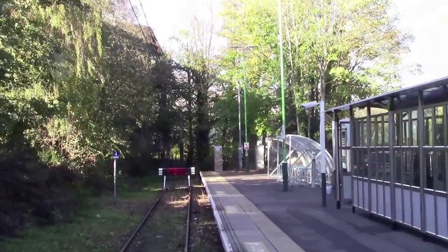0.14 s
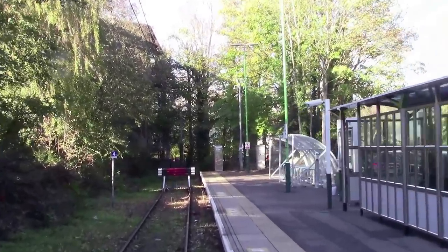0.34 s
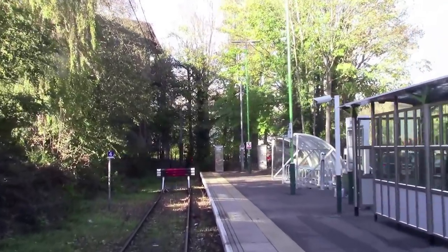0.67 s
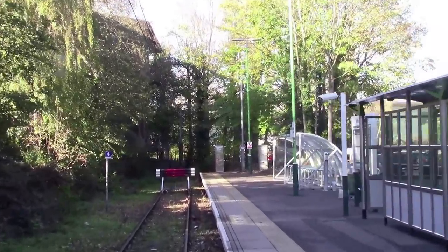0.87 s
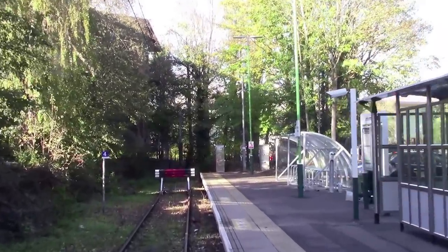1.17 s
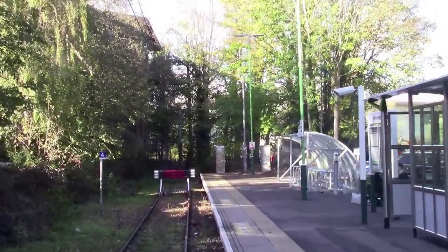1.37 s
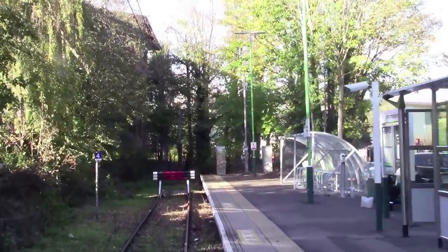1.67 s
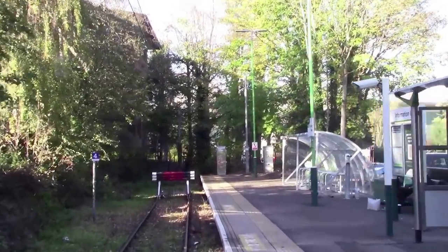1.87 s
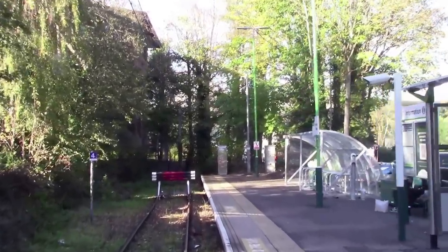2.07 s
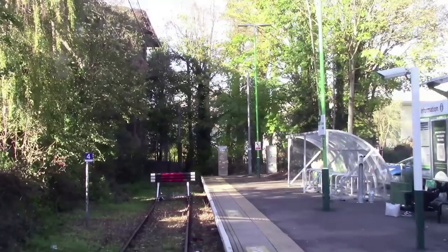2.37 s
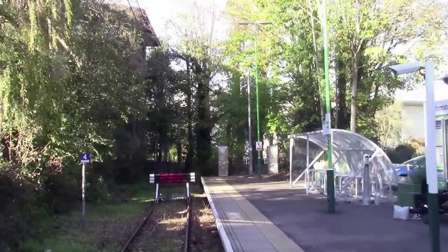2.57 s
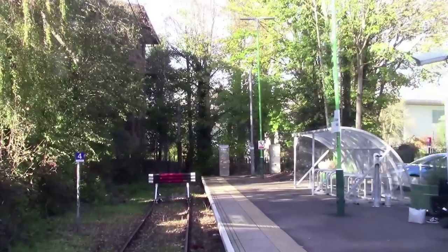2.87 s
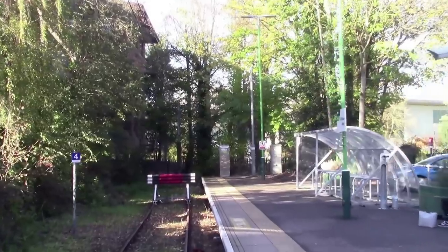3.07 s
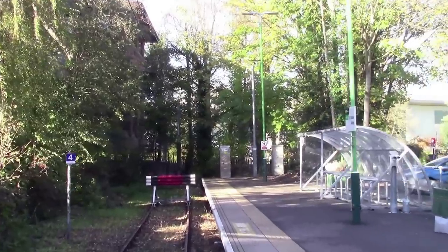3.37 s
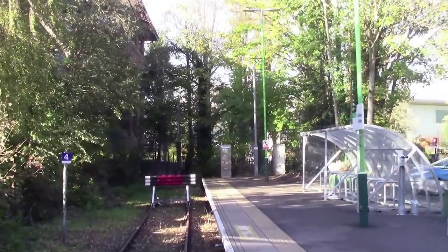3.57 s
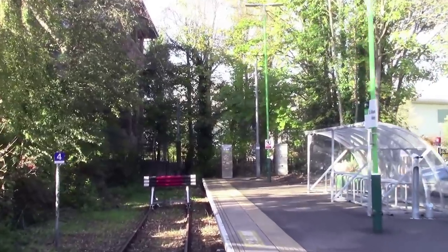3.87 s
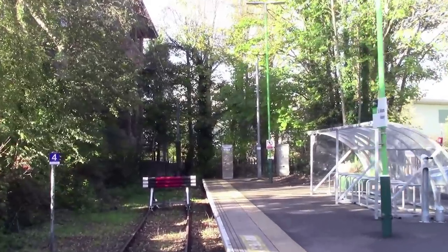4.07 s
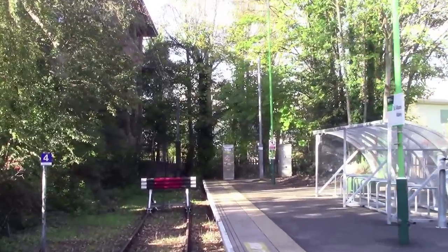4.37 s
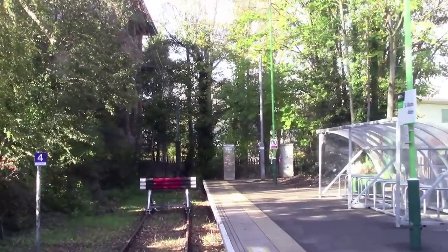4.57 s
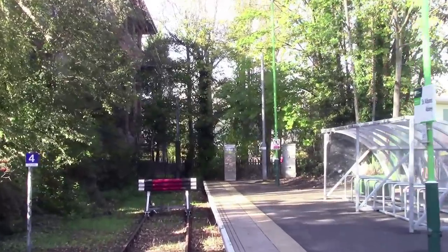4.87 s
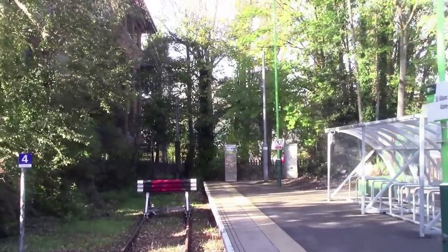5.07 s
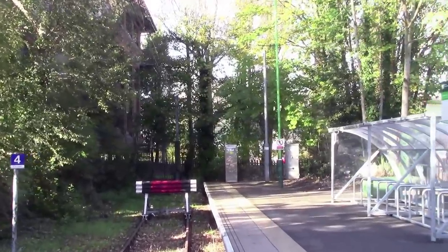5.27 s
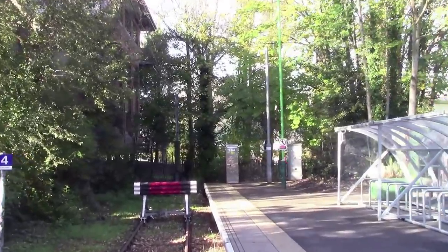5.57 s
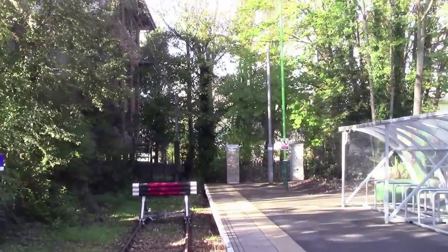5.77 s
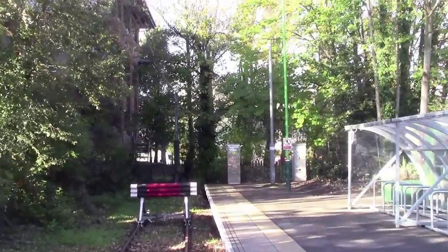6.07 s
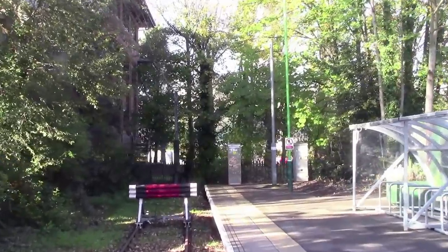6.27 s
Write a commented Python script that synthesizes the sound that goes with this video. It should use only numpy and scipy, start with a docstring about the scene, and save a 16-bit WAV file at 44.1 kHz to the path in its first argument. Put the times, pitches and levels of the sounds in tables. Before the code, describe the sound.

Inside the cab of an electric train rolling slowly beside a platform, a deep electrical hum holds throughout, swelling and dipping slowly. Low wheel rumble and soft duct hiss lie beneath it, with a faint high brake whistle. After a second, dull thuds come through the floor, hardest near three and just before four seconds. The rumble then eases, and a small thud with a puff of air comes near the end. Close, nearly mono microphones.

```python
"""Inside the cab of an electric train creeping to a stop, on a small, nearly mono microphone pair.
Throughout, two converters hum on multiples of one supply frequency, their shared tones beating as they slip;
wheel rumble comes through the floor, air hisses in the ducts and a brake block whistles faintly, with short squeaks.
From 1.1 s floor bursts thud as wheels cross rail joints; a breathy band swells at 1.4 s.
The hardest thuds fall near 2.9 and 3.8 s, then the rumble weakens; a puff of air joins the last thud at 5.7 s."""
import sys
import numpy as np
from scipy.fft import rfft, irfft, next_fast_len
from scipy.io import wavfile
from scipy.ndimage import map_coordinates

SR = 44100
rng = np.random.default_rng(int(sys.argv[2]) if len(sys.argv) > 2 else 0)


def generate_wav(signal):
    """Clip the signal to [-1, 1] and save it as 16-bit WAV at the path in sys.argv[1]."""
    frames = np.transpose(np.atleast_2d(signal))
    scaled = np.clip(frames, -1, 1) * 32767
    pcm = np.round(scaled).astype(np.int16)
    wavfile.write(sys.argv[1], SR, pcm)


N = 284003
T = np.arange(N) / SR


def amp(db):
    """Decibels to gain."""
    return 10 ** (np.asarray(db) / 20)


def unit(x):
    """Scaled to rms 1."""
    return x / np.sqrt(np.mean(x ** 2) + 1e-20)


def along(points, hz):
    """Interpolates (frequency [Hz], value) points on a log frequency axis."""
    point_hz, values = np.transpose(points)
    return np.interp(np.log(hz + 1), np.log(point_hz + 1), values)


def curves(rows):
    """One value per sample for each column after the time."""
    time_s, *columns = np.transpose(rows)
    return [np.interp(T, time_s, column) for column in columns]


def wobble(rate_hz):
    """Smooth random curve, rate_hz knots a second."""
    knots = rng.standard_normal(int(N * rate_hz / SR) + 4)
    return map_coordinates(knots, [T * rate_hz])


def filtered(x, response):
    """x times a response of frequency, zero-padded."""
    m = next_fast_len(N + 8192)
    spectrum = rfft(x, m) * response(np.fft.rfftfreq(m, 1 / SR))
    return irfft(spectrum, m)[..., :N]


# stereo width of noise: (frequency [Hz], side minus mid [dB])
SIDE_MINUS_MID = [(40, -29), (95, -29.5), (230, -30), (370, -23.5), (580, -18.5), (1000, -12.5),
                  (4000, -14.5), (15000, -19)]


def rush(gain):
    """Stereo noise of rms 1, shaped by a gain over frequency."""
    def mid_side_gain(hz):
        return gain(hz) * amp([0 * hz, along(SIDE_MINUS_MID, hz)])

    mid, side = filtered(rng.standard_normal((2, N)), mid_side_gain)
    return unit(np.array([mid + side, mid - side]))


def band(centre_hz, width_hz):
    """Gain of a resonance applied twice; width between half-gain points."""
    return lambda hz: 1 / (1 + (2 * (hz - centre_hz) / width_hz) ** 2)


def window(centre_s, length_s):
    """Flat-topped swell, length_s between its 1/e points."""
    return np.exp(-(2 * (T - centre_s) / length_s) ** 4)


def thread(pitch_hz, wander_hz, flutter_db):
    """Thin tone of rms 1 whose pitch and strength tremble quickly."""
    flutter, wander = wobble(60), wobble(110)
    turns = 2 * np.pi * np.cumsum(pitch_hz + wander_hz * wander) / SR
    return unit(amp(flutter_db * flutter) * np.sin(turns))


# slow slip between converters: (time [s], lead of the second [degrees of a supply cycle])
CONVERTER_SLIP = [(0.0, 0.5), (0.4, 11.4), (0.8, 8.0), (1.2, 11.2), (1.6, 26.7), (2.0, 43.5), (2.5, 58),
                  (3.0, 64.5), (3.5, 70.8), (4.0, 82.5), (4.6, 90), (5.2, 105), (5.8, 113.5), (6.44, 113.5)]
# tones of both converters: (multiple of supply, rms of the first [dB], size of the second [0-1],
# beat phase of the dip [turns], left-right [dB])
SHARED_TONES = [(4, -18, .62, .04, 0.49), (8, -42, .47, .63, -1.2), (12, -44.5, .6, .03, 1.5),
                (20, -54.5, .44, 0.2, -1), (24, -51.5, .14, .61, 1.3), (46, -58, 0.4, .82, 1.2)]
# steadier tones: (multiple of supply, rounded in use, mid rms level [dB], left-right [dB])
STEADY_TONES = [(5, -44.0, 2), (10, -55, 3), (15, -52.5, 2), (16, -56.5, -1), (25, -68.5, -1),
                (26, -70.5, 4.5), (28, -65.5, -2.5), (30, -73, -2.5), (31, -72, 0.5), (32, -73, -7),
                (34, -69.5, -1), (35, -72, 6.5), (36, -66.5, 7.5), (38, -76.5, 2.5), (40, -69.5, 0.8),
                (41, -64, -0.5), (43, -82, -1.5), (44, -68.5, -3.5), (45, -63, 2.5), (48, -75.5, -3.3),
                (49, -78, 3.2), (50, -67, 2), (51, -77, -3), (53, -74.5, -4), (54, -78, 1.5),
                (56, -70.5, 8), (58, -70.5, 0.5), (61, -74, 0), (65.6, -70.5, -3), (67.6, -80, 0.9)]
SUPPLY_HZ, SUPPLY_DRIFT_HZ, TONE_WOBBLE_DB = 51.5, .012, 2.3


def ports(rms_db, pan_db):
    """Sine peak gains at the two microphone ports, split by the left-right balance."""
    return np.sqrt(2) * amp(rms_db) * amp([[pan_db / 2], [-pan_db / 2]])


def converters():
    """Sines locked to the slightly drifting supply; slip between two sines of one tone makes it beat."""
    turns = 2 * np.pi * np.cumsum(SUPPLY_HZ + SUPPLY_DRIFT_HZ * wobble(2)) / SR
    slip = np.radians(curves(CONVERTER_SLIP)[0])
    hum = np.zeros((2, N))
    for k, db, second_size, dip, pan_db in SHARED_TONES:
        first = round(k) * turns + rng.uniform(0, 2 * np.pi)
        # opposite sign: cancels most where the slip meets the dip phase
        second = first + round(k) * slip - 2 * np.pi * dip
        hum += ports(db, pan_db) * (np.sin(first) - second_size * np.sin(second))
    for k, db, pan_db in STEADY_TONES:
        phase = round(k) * turns + rng.uniform(0, 2 * np.pi)
        hum += ports(db + TONE_WOBBLE_DB * wobble(4), pan_db) * np.sin(phase)
    return hum


# resonances of cab floor and walls: (centre [Hz], width [Hz], gain [dB])
FLOOR_MODES = [(143, 86, -6), (213, 59, 4.5), (302.4, 55, 1), (377, 120, -5), (486, 96, -3),
               (570, 50, -10.5), (644, 110, -9.5), (752, 100, -12), (894, 94, -13), (1110, 71, -23.5),
               (1270, 140, -30.5)]


def floor(hz):
    """Gain of the cab floor: its resonances added in power."""
    return np.sqrt(sum((amp(db) * band(centre_hz, width_hz)(hz)) ** 2
                       for centre_hz, width_hz, db in FLOOR_MODES))


# spectrum of the low rumble: (frequency [Hz], relative density [dB per Hz])
RUMBLE_SPECTRUM = [(50, -120), (80, -10.5), (100, -3.5), (120, 0), (145, 0.5), (175, -5.5), (230, -25),
                   (400, -120)]


def rumble_gain(hz, level_db=0):
    """Gain of the low rumble over frequency."""
    return amp(level_db + along(RUMBLE_SPECTRUM, hz))


# wheels on joints: (time [s], level before rise and decay [dB], t60 [s], tilt [dB per octave])
JOINT_THUDS = [(1.12, -43, .35, -.5), (1.36, -36, .6, 1), (1.5, -37, .27, -2), (1.625, -30, .3, -5),
               (1.892, -24.5, .45, -3.5), (2.42, -28.5, 0.35, -5.5), (2.74, -36, .33, -6),
               (2.888, -21, .22, 2), (2.921, -16, .24, 1), (2.99, -26.5, .45, -2.5),
               (3.755, -24.5, 0.57, 1.5), (3.787, -17.5, 0.36, -3), (3.846, -30.5, .25, 3.5),
               (4.06, -38, .3, -3.5), (5.74, -33.5, .2, -0.5)]
SOFT_RISE_S, SOFT_DB, HALVES_DB = 0.028, -40, 8  # rise time at SOFT_DB; halves per HALVES_DB of level
THUMP_DB, RATTLE_DB = -2, 1.5  # rumble share; level unevenness


def thuds():
    """Each joint shakes the floor: a dull burst that dies away; hard blows rise faster."""
    out = np.zeros((2, N))
    for start_s, db, t60_s, tilt_db in JOINT_THUDS:
        def shake_gain(hz):
            tilt = amp(tilt_db * np.log2((hz + 30) / 300))
            return np.hypot(floor(hz), rumble_gain(hz, THUMP_DB)) * tilt

        t = np.maximum(T - start_s, 0)
        rise_s = SOFT_RISE_S * 2 ** ((SOFT_DB - db) / HALVES_DB)
        onset = 1 - np.exp(-(t / rise_s) ** 2)
        decay = amp(db + RATTLE_DB * wobble(50) - 60 * t / t60_s)
        out += decay * onset * rush(shake_gain)
    return out


# rolling noise: (time [s], rumble level [dB], body level before BODY_OFFSET_DB [dB])
ROLL_LEVELS = [(0, -44.5, -46), (1.0, -39.5, -46.5), (1.7, -38.5, -45), (2.3, -42.5, -48.5),
               (2.9, -35.5, -46), (3.5, -46, -47.5), (3.9, -34, -45.5), (4.4, -44.5, -49), (5.3, -45, -48),
               (6.44, -47, -48)]
# steady sway of the car body: (frequency [Hz], relative density [dB per Hz])
SWAY_SPECTRUM = [(15, -61), (28, -24), (48, -8.5), (60, -6.5), (85, -1), (100, -6), (130, -30), (250, -120)]
BODY_OFFSET_DB, SWAY_DB = 9.0, -46.5
RUMBLE_LUMPS_DB, BODY_LUMPS_DB, SWAY_LUMPS_DB = 2, 1.5, 0.2


def rolling():
    """Rail roughness shakes the floor in lumps: low rumble and floor resonances over a steady sway."""
    rumble_db, body_db = curves(ROLL_LEVELS)
    rumble = amp(rumble_db + RUMBLE_LUMPS_DB * wobble(7)) * rush(rumble_gain)
    sway_level = amp(SWAY_DB + SWAY_LUMPS_DB * wobble(3))
    sway = sway_level * rush(lambda hz: amp(along(SWAY_SPECTRUM, hz)))
    body = amp(body_db + BODY_OFFSET_DB + BODY_LUMPS_DB * wobble(9)) * rush(floor)
    return sway + rumble + body


# brake block whistle: (time [s], pitch [Hz], level [dB])
WHISTLE = [(0, 3280, -58), (.35, 3267, -62.5), (.68, 3250, -60), (.9, 3200, -68), (1.1, 3286, -58.5),
           (1.35, 3206, -68), (1.56, 3300, -57), (1.7, 3200, -68.5), (1.92, 3277, -56), (2.02, 3263, -62.5),
           (2.07, 3096, -62), (2.34, 3070, -58.5), (2.55, 3085, -65.5), (2.86, 3105, -62), (3.0, 3120, -56),
           (3.13, 3125, -55.5), (3.2, 3250, -65.5), (3.62, 3250, -59.5), (3.78, 3246, -66),
           (3.83, 3116, -60), (3.93, 3102, -55), (4.32, 3110, -61), (4.6, 3080, -53.5), (4.85, 3113, -58.5),
           (5.1, 3120, -57), (5.5, 3077, -55), (5.66, 3130, -68.5), (5.85, 3120, -58.5),
           (6.44, 3086, -58.5)]
CLEAR_HZ, BREATHY_HZ = 3040, 3350  # all thread at the first, all breath at the second
WAVER_HZ, WAVER_DB = 14, 1.9


def brake_whistle():
    """A wandering brake block whistle, part thin thread and part breath, breathier when higher."""
    pitch_hz, db = curves(WHISTLE)
    breath = np.clip((pitch_hz - CLEAR_HZ) / (BREATHY_HZ - CLEAR_HZ), 0, 1)
    pitch_hz = pitch_hz + WAVER_HZ * wobble(8)
    turns = 2 * np.pi * np.cumsum(pitch_hz) / SR
    # two slow noises in quadrature: a fuzzy band round the pitch
    fuzz = rush(band(0, 300)) * np.cos(turns) + rush(band(0, 280)) * np.sin(turns)
    thin = thread(pitch_hz, wander_hz=34, flutter_db=3)
    return amp(db + WAVER_DB * wobble(9)) * (np.sqrt(1 - breath) * thin + np.sqrt(breath) * fuzz)


# short squeaks of the brake gear: (time [s], level [dB])
BRAKE_SQUEAKS = [(.77, -61), (4.14, -65.5), (4.442, -71), (5.095, -63), (5.41, -73), (6.11, -62)]
SQUEAK_S, SQUEAK_HZ = .062, 3865


def brake_squeaks():
    """The brake gear squeaks: brief trembling threads round one pitch."""
    return sum(amp(db) * window(at_s, SQUEAK_S) * thread(SQUEAK_HZ, wander_hz=13, flutter_db=4.0)
               for at_s, db in BRAKE_SQUEAKS)


SIGH_AT_S, SIGH_S, SIGH_DB = 1.385, .22, -54
SIGH_HZ, SIGH_WIDTH_HZ = 2360, 350


def sigh():
    """A breathy band of noise swells briefly."""
    return amp(SIGH_DB) * window(SIGH_AT_S, SIGH_S) * rush(band(SIGH_HZ, SIGH_WIDTH_HZ))


# bands of the air puff: (centre [Hz], width [Hz], level [dB])
PUFF_BANDS = [(4030, 220, -59), (5600, 2600, -63.5), (9000, 2630, -69)]
PUFF_AT_S, PUFF_S = 5.74, .048


def puff():
    """One puff of air: noise bands under one short window."""
    air = sum(amp(db) * rush(band(hz, width_hz)) for hz, width_hz, db in PUFF_BANDS)
    return window(PUFF_AT_S, PUFF_S) * air


# ventilation hiss: (frequency [Hz], relative density [dB per Hz])
DUCT_SPECTRUM = [(500, -31), (900, 2), (1300, -5), (1800, -6.5), (2800, -9.5), (3400, -12.5), (3700, -15.5),
                 (5000, -21), (6300, -20.5), (8500, -25), (10500, -30.5), (13000, -36.5), (15700, -36)]
# narrow hiss bands: (centre [Hz], width [Hz], mid rms level [dB])
DUCT_WHINES = [(3910, 60, -78.5), (6310, 100, -80.5), (9090, 90, -83.5), (9290, 80, -84), (9410, 60, -86.5),
               (11050, 300, -84.5)]
HISS_DB, HISS_WOBBLE_DB, WHINE_WOBBLE_DB = -52, 0.76, 2


def ducts():
    """Smooth ventilation hiss, shaped noise, with a few narrow whines."""
    hiss_level = amp(HISS_DB + HISS_WOBBLE_DB * wobble(8.4))
    hiss = hiss_level * rush(lambda hz: amp(along(DUCT_SPECTRUM, hz)))
    whines = sum(amp(db + WHINE_WOBBLE_DB * wobble(3.6)) * rush(band(hz, width_hz))
                 for hz, width_hz, db in DUCT_WHINES)
    return hiss + whines


def scene():
    """All sources reach the microphone inside the cab."""
    brake = brake_whistle() + brake_squeaks()
    return converters() + thuds() + rolling() + brake + sigh() + puff() + ducts()


BASS_LOSS_HZ, TOP_HZ, FADE_S = 45, 15750, .003


def record(dry):
    """The microphone loses the deepest bass; the recorder keeps nothing above its band limit."""
    fade = np.minimum(1, np.minimum(T, T[::-1]) / FADE_S)
    return filtered(dry * fade, lambda hz: (hz < TOP_HZ) * hz ** 2 / (hz ** 2 + BASS_LOSS_HZ ** 2))


dry = scene()
out = record(dry)
generate_wav(out)
```